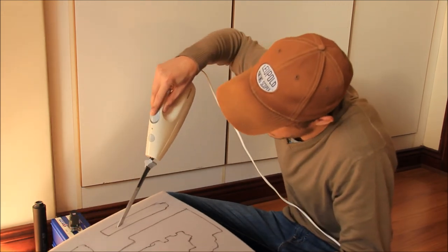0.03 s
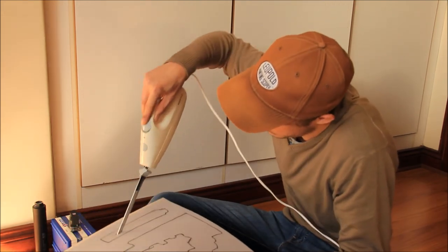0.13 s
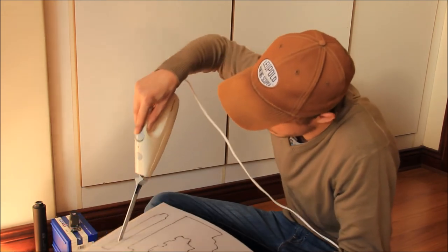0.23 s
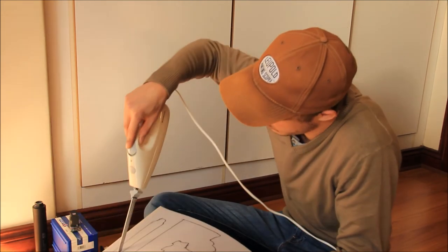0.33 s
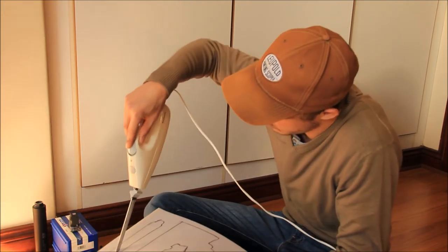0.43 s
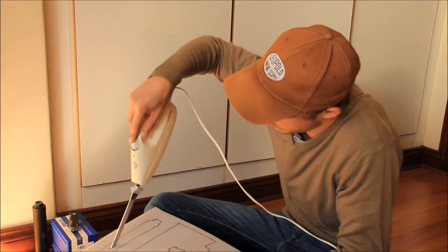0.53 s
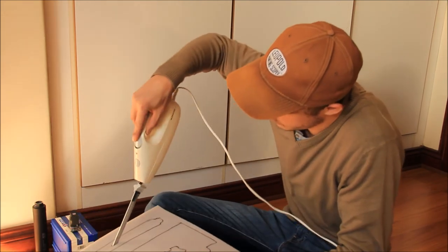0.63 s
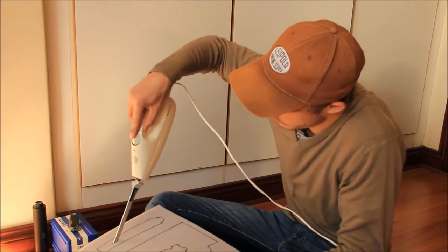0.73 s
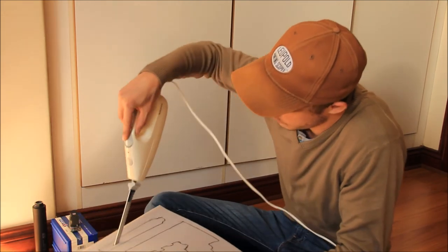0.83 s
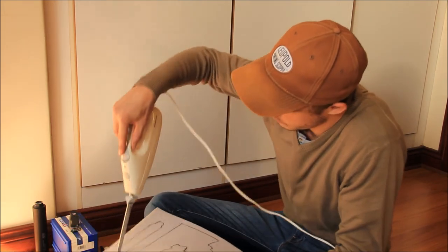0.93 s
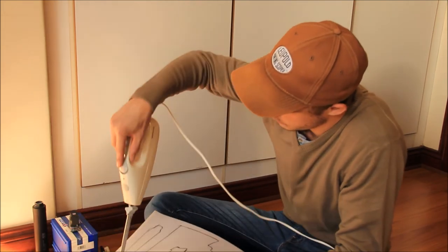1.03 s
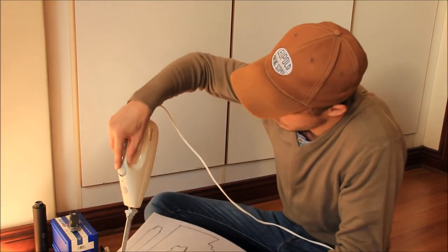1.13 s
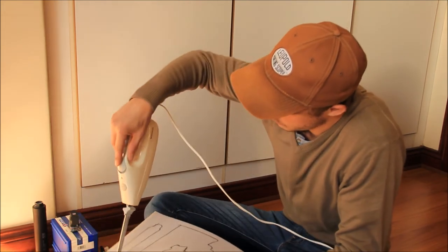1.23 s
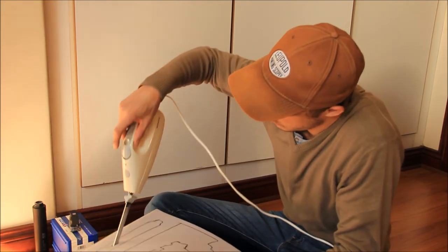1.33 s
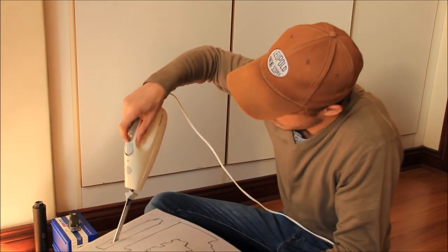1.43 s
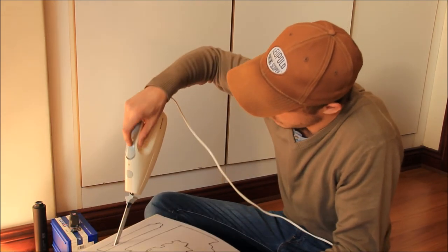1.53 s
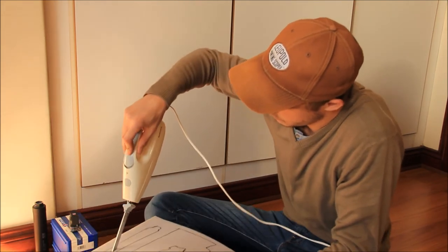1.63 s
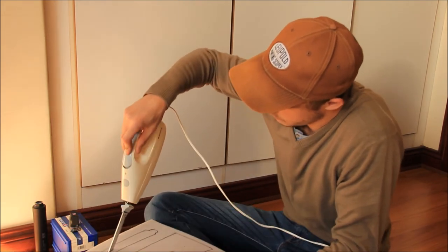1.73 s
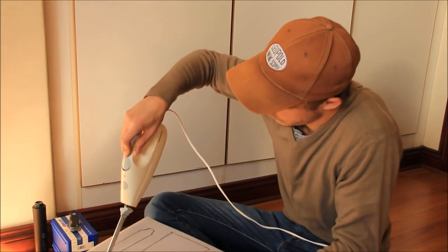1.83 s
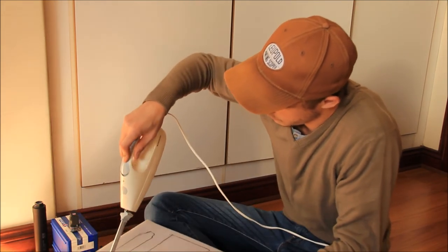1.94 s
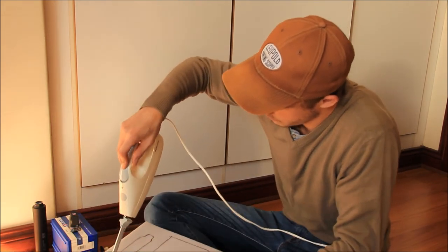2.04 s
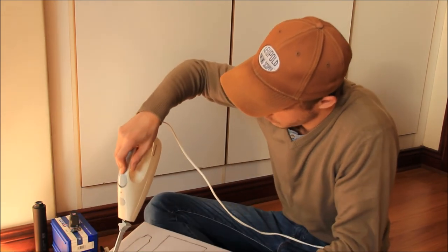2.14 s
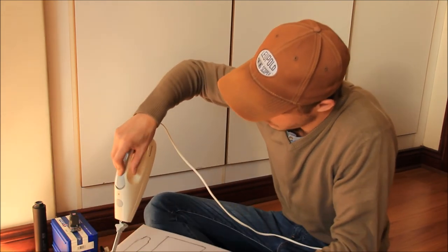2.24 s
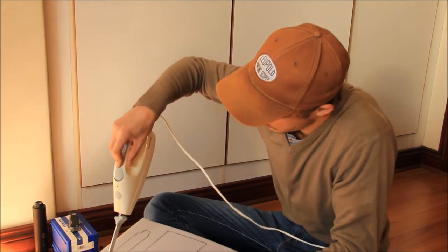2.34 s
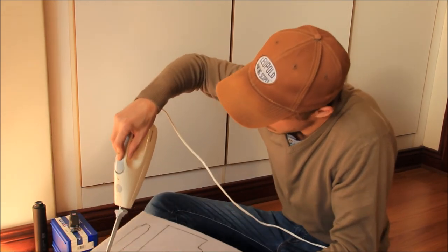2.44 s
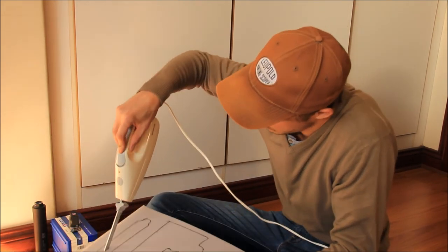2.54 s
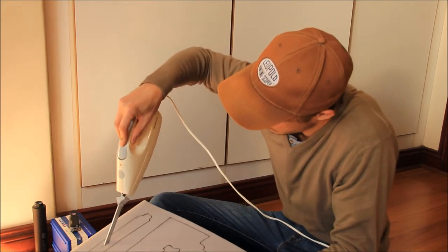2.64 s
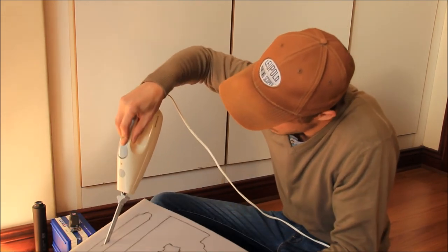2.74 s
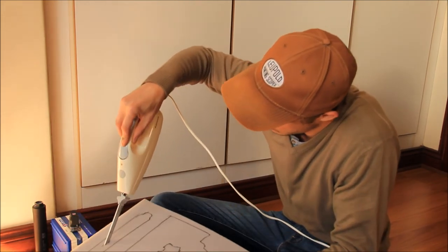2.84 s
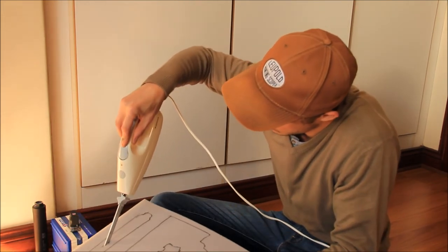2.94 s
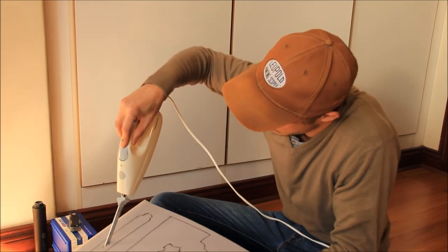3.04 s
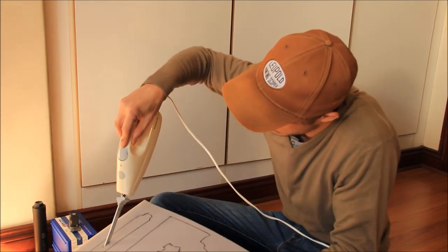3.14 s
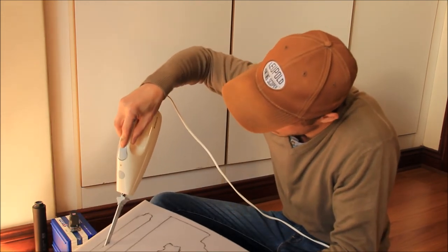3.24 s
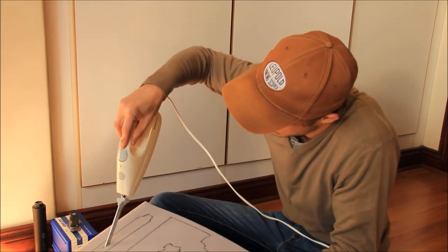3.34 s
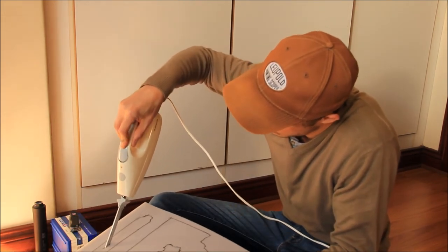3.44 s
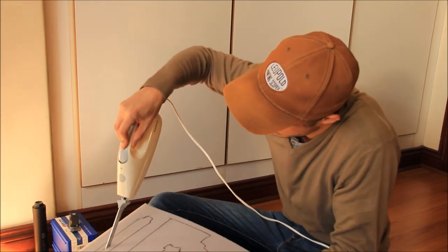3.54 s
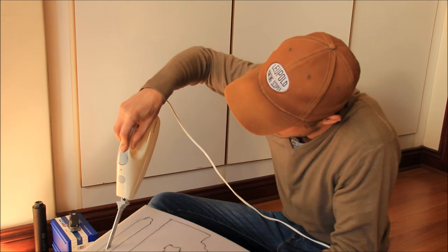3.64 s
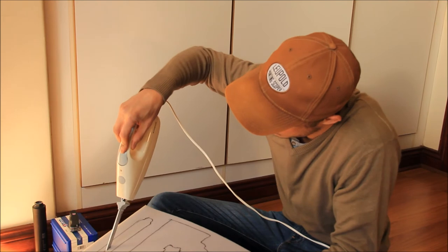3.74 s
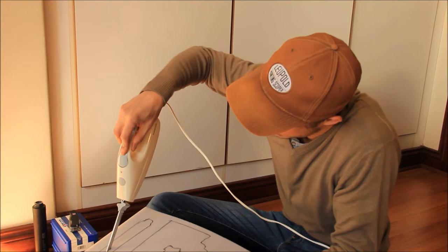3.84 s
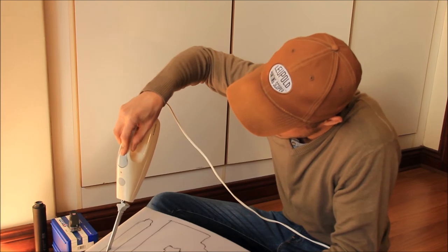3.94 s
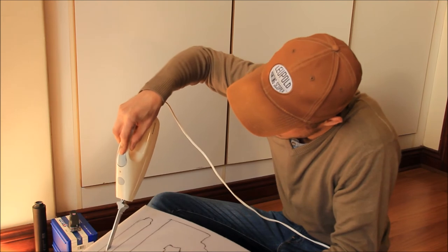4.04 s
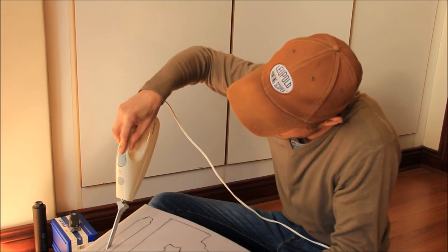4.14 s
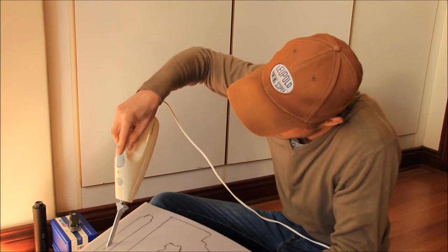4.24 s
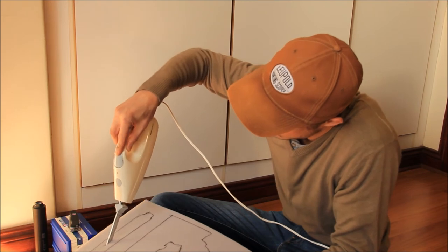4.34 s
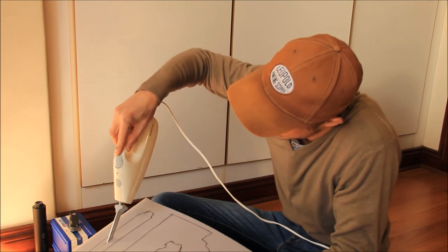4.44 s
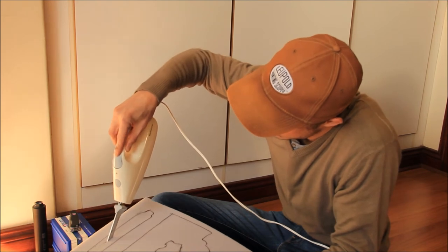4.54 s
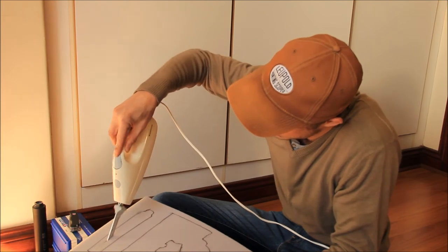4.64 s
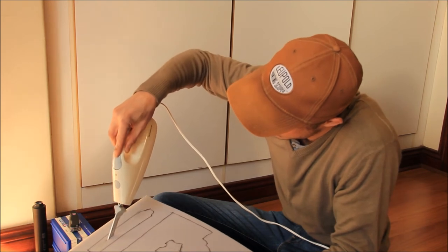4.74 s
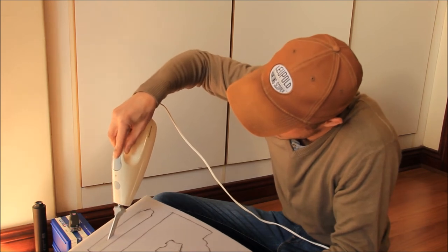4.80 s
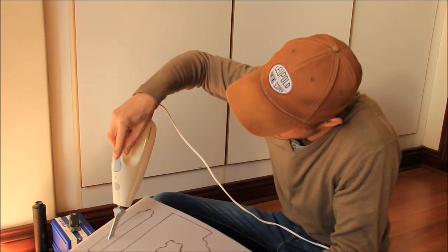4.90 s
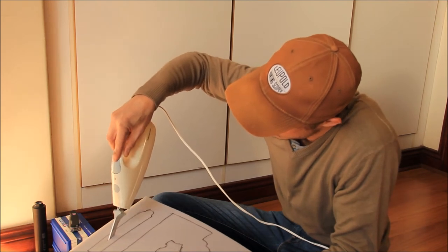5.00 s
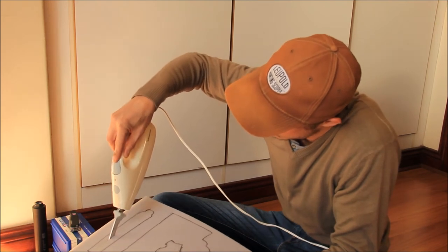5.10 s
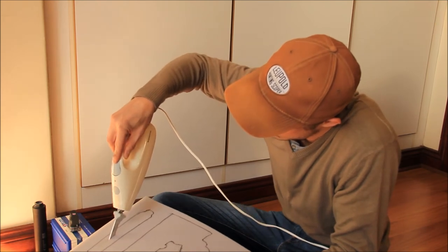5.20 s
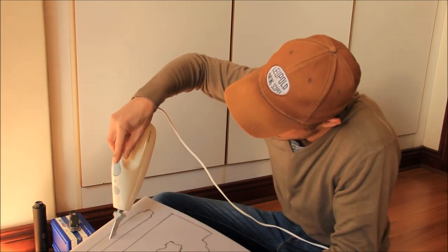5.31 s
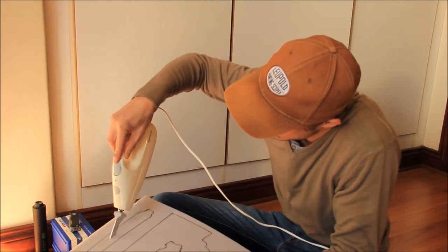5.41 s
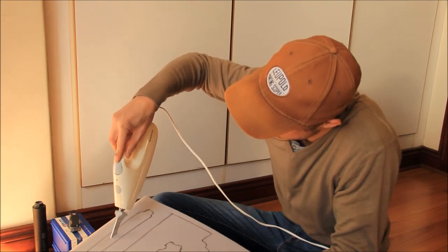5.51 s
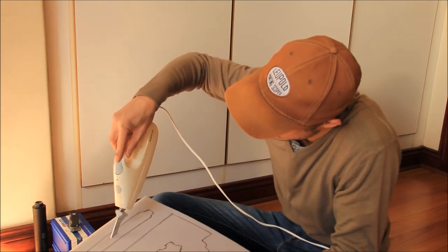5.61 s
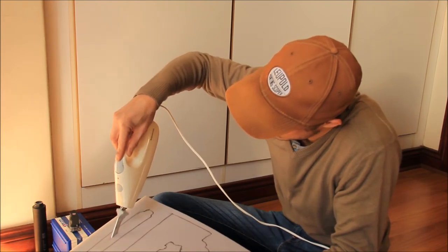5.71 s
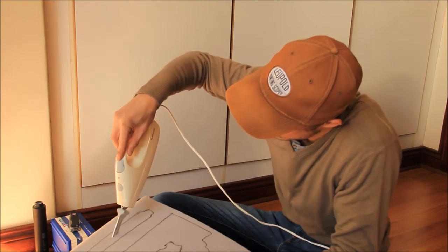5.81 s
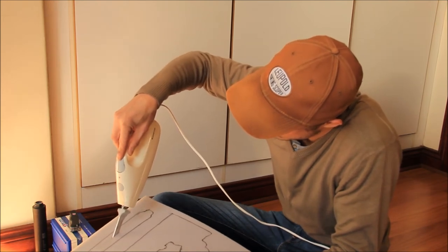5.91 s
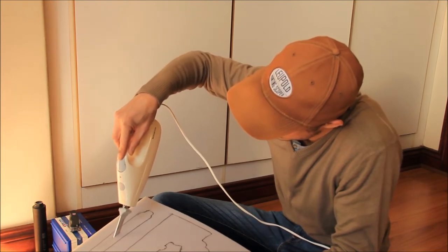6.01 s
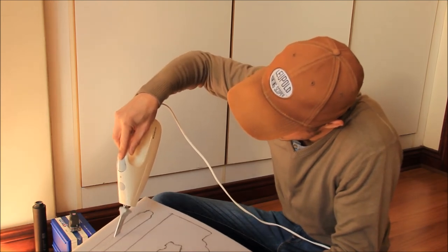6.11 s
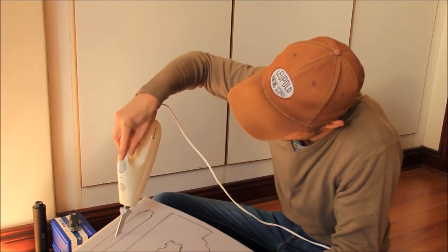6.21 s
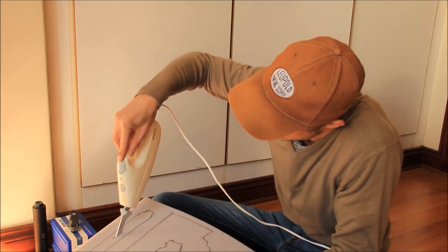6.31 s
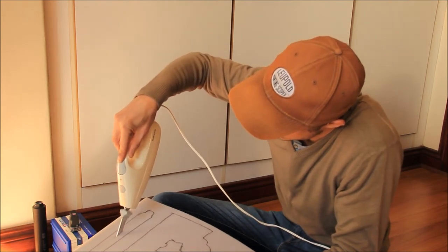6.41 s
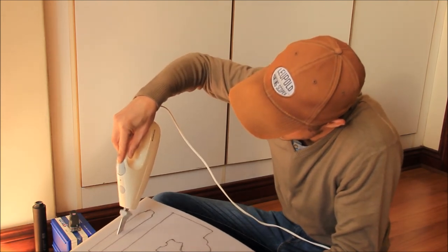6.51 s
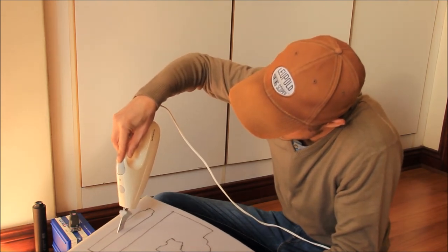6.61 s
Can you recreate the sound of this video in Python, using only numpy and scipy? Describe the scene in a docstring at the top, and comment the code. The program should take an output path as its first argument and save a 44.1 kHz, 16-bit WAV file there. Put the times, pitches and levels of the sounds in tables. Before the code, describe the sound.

In a small room, an electric carving knife is set against a foam slab: plastic knocks, grainy rubbing and one hollow bump over low rumble and hiss. After a quiet gap, a catch snaps, the trigger clicks, and the motor starts suddenly, buzzing and whining upward into a loud, steady clatter and scrape that continues to the end. Close microphone, short room reflections.

```python
"""Small room: an electric carving knife is brought to a foam slab with knocks, rubbing and a dull bump.
Catch and trigger click as struck modes; the motor spins up, sags under load and drives one crank phase.
From it come blade clatter and scrape (coloured grains), handle tones (crank harmonics) and rotor whine.
A starting buzz dies as speed builds, and blade steel clinks. Low rumble and hiss lie under the handling
until the knife starts; a faint hum passes briefly."""
import sys
import numpy as np
from scipy import signal
from scipy.fft import rfft, irfft
from scipy.io import wavfile

SR = 44100
rng = np.random.default_rng(int(sys.argv[2]) if len(sys.argv) > 2 else 0)


def int16_out(signal):
    """Quantize to a 16-bit WAV file."""
    q = np.round(np.clip(np.atleast_2d(signal).T, -1, 1) * 32767)
    wavfile.write(sys.argv[1], SR, q.astype(np.int16))


N = 293706
TIME = np.arange(N) / SR


def amp(db):
    """Decibels to gain."""
    return 10 ** (np.asarray(db) / 20)


def unit(x):
    """Scales to rms 1."""
    return x / np.sqrt(np.mean(x ** 2) + 1e-20)


def at_hz(points, hz):
    """Interpolates (f/Hz, value) points on a log-frequency axis."""
    f_hz, value = np.transpose(points)
    return np.interp(np.log(hz + 1), np.log(f_hz), value)


def colour(x, points):
    """Minimum-phase filter with the given spectrum shape; white noise keeps its level."""
    gain = unit(amp(at_hz(points, abs(np.fft.fftfreq(4096, 1 / SR)))))
    log_spectrum = np.conj(signal.hilbert(np.log(gain)))
    taps = np.fft.ifft(np.exp(log_spectrum)).real
    return signal.oaconvolve(x, taps[:len(taps) // 2])[:N]


def noise():
    """White noise of rms 1."""
    return rng.standard_normal(N)


def wander(rate_hz):
    """Slow random signal of rms 1: noise under a Gaussian low-pass."""
    lowpass = np.exp(-(np.fft.rfftfreq(N, 1 / SR) / rate_hz) ** 2)
    return unit(irfft(rfft(noise()) * lowpass, N))


def grains(per_s, spread_db):
    """Tiny impacts of random time, size and sign, scaled to rms 1."""
    size = amp(spread_db * np.clip(noise(), -2, 2))
    struck = rng.random(N) < per_s / SR
    return unit(np.sign(noise()) * size * struck)


def swell(middle_s, length_s):
    """Smooth rise and fall of height 1; length is taken at half height."""
    return .5 ** (((TIME - middle_s) / (length_s / 2)) ** 2)


def ramp(start_s, rise_s):
    """Goes from 0 to 1 in the rise time."""
    return np.clip((TIME - start_s) / rise_s, 0, 1)


def held(start_s, end_s, fade_s):
    """Fades in around the start, holds, fades out around the end."""
    return ramp(start_s - fade_s / 2, fade_s) - ramp(end_s - fade_s / 2, fade_s)


def add(mix, at_s, sound):
    """Lays a sound into the mix."""
    part = mix[round(at_s * SR):][:len(sound)]
    part += sound[:len(part)]


def ring(at_s, level_db, modes, rise_s=0.00093):
    """One soft-edged blow on a body: a sum of exponentially dying modes."""
    out, t = np.zeros(N), TIME[:SR // 4]
    note = sum(amp(db) * 1000 ** (-t / t60_s) * np.sin(2 * np.pi * hz * t) for hz, db, t60_s in modes)
    add(out, at_s, amp(level_db) * note * (1 - np.exp(-t / rise_s)))
    return out


def highpass(x, hz):
    """Second-order bass cut."""
    return signal.sosfilt(signal.butter(2, hz, "high", fs=SR, output="sos"), x)


# reverberation time: f/Hz, t60/s
ROOM_T60 = [(200, 0.29), (700, 0.73), (2000, 0.46), (5000, 0.6), (14000, 0.54)]


def room(x, wet_db):
    """Direct sound plus sparse echoes that die band by band; sum scaled to keep power."""
    size = SR // 2
    echo_mask = (rng.random(size) < 4000 / SR) * (TIME[:size] > .003)
    taps = rng.choice([-1., 1.], size) * echo_mask
    hz, t, bands = signal.stft(taps, SR, nperseg=256)
    decay = amp(-60 * t / at_hz(ROOM_T60, hz)[:, None])
    tail = signal.istft(bands * decay, SR, nperseg=256)[1]
    echoes = signal.oaconvolve(x, tail / np.linalg.norm(tail))[:N]
    return (x + amp(wet_db) * echoes) / np.hypot(1, amp(wet_db))


# low rumble and hiss, spectrum shape: f/Hz, level/dB
BACKGROUND_COLOUR = [(15, -3), (30, -2), (55, 1), (100, 1), (250, -1), (450, -2), (800, -5), (1400, -9),
                     (2500, -12), (5000, -15), (9000, -16.5), (15500, -18)]
# left-right likeness: f/Hz, likeness/0-1
BACKGROUND_LIKENESS = [(30, 0.23), (150, 1), (550, 0.94), (1650, 0.88), (5000, 0.51), (15000, 0.35)]
BACKGROUND_DB, FADE_OUT_S, FADE_OUT_DB_PER_S = -46, 3.89, 90


def background():
    """Low rumble and hiss, partly alike left and right, faded out from 3.89 s."""
    likeness = np.clip(at_hz(BACKGROUND_LIKENESS, np.fft.rfftfreq(N, 1 / SR)), 0, 1)
    mid = irfft(rfft(noise()) * np.sqrt((1 + likeness) / 2), N)
    side = irfft(rfft(noise()) * np.sqrt((1 - likeness) / 2), N)
    level_db = BACKGROUND_DB - FADE_OUT_DB_PER_S * np.maximum(TIME - FADE_OUT_S, 0)
    stereo = np.array([colour(mid + side, BACKGROUND_COLOUR), colour(mid - side, BACKGROUND_COLOUR)])
    return stereo * amp(level_db)


# blade and sleeve slide over the foam: middle t/s, length/s, rub level/dB, hiss level/dB
SLIDES = [(0.023, 0.16, -50.5, -49), (0.412, 0.21, -45.5, -53), (0.578, 0.049, -48, -44.5),
          (0.84, 0.072, -44.5, -53), (0.987, 0.21, -44.5, -42.5), (1.222, 0.086, -51, -35.5),
          (1.54, 0.29, -57, -50), (1.83, 0.28, -47.5, -51.5), (2.15, 0.35, -47, -63),
          (3.58, 0.11, -56, -57)]
# low and high friction noise, spectrum shapes: f/Hz, level/dB
RUB_COLOUR = [(100, -27), (220, -2), (450, 2.5), (900, -0.5), (1800, -7.5), (2800, -8), (5000, -39)]
HISS_COLOUR = [(1500, 0.5), (3000, -3.5), (4500, 0.5), (6000, -2), (7400, -5), (8700, -3), (10500, -13),
               (13000, -10), (16000, -10)]
PLACING_START_S, PLACING_END_S, PLACING_FADE_S = 0, 2.35, .2
PLACING_RUB_DB, PLACING_HISS_DB = -58, -53


def rubbing(patchy_db=1.5):
    """Grainy, uneven friction as the knife is brought into place: slides over a light rustle."""
    placing = held(PLACING_START_S, PLACING_END_S, PLACING_FADE_S)
    rub_gain, hiss_gain = amp(PLACING_RUB_DB) * placing, amp(PLACING_HISS_DB) * placing
    for middle_s, length_s, rub_db, hiss_db in SLIDES:
        slide = swell(middle_s, length_s)
        rub_gain = np.hypot(rub_gain, amp(rub_db) * slide)
        hiss_gain = np.hypot(hiss_gain, amp(hiss_db) * slide)
    rub = rub_gain * colour(grains(per_s=2200, spread_db=3.0), RUB_COLOUR)
    hiss = hiss_gain * colour(grains(per_s=9000, spread_db=2.5), HISS_COLOUR)
    return (rub + hiss) * amp(patchy_db * wander(40))


# handling and switch knocks: t/s, peak level/dB, thud tilt/dB, tick tilt/dB, decay/s
# the rows at 0.404 and 3.483 are the dying tails of the knocks before them
KNOCKS = [(0.015, -32.5, 7, 7, 0.0068), (0.386, -15, 12, 11, 0.0086), (0.404, -29, 13, 25, 0.016),
          (0.425, -26, -2, 18, 0.0034), (0.455, -21.5, -16, -1, 0.0069), (0.547, -28, -10, -3, 0.003),
          (0.71, -33.5, 6, 10, 0.0044), (0.837, -34, 7, 3, 0.0063), (1.003, -21.5, 3, -4, 0.0031),
          (1.319, -32, -11, 10, 0.006), (1.385, -24.5, 3, 12, 0.0047), (1.391, -19, 18, -5, 0.0038),
          (1.672, -26, -17, -14, 0.0096), (2.075, -33, 15, 5, 0.0052), (2.186, -31, 7, -9, 0.006),
          (2.225, -27, -12, -6, 0.0032), (3.464, -21.5, 7, 18, 0.0066), (3.483, -29.5, -6, 14, 0.016),
          (3.592, -34, 14, -6, 0.006), (3.934, -12, -10, 1.5, 0.0043)]
# plastic handle resonances: f/Hz, width/Hz, level/dB
HANDLE = [(390, 57, -17), (586, 66, 4), (1040, 140, 4), (1595, 500, 11.5), (2250, 650, -12),
          (3660, 1500, -2), (5300, 900, -14.5), (7800, 1600, -13)]


def knocks(low_hz=260):
    """Each knock or knock tail is a short scuff that rings the handle, tilted to thud or tick."""
    out, t = np.zeros(N), TIME[:SR // 10]
    for at_s, peak_db, thud_db, tick_db, decay_s in KNOCKS:
        scuff = rng.standard_normal(len(t)) * np.exp(-t / decay_s)
        tilt = [(600, thud_db), (1100, 0), (2200, 0), (3500, tick_db)]
        handle = np.zeros(len(t))
        for hz, width_hz, mode_db in HANDLE:
            gain = amp(mode_db + at_hz(tilt, hz)) * np.sqrt(width_hz)
            handle += gain * np.exp(-np.pi * width_hz * t) * np.sin(2 * np.pi * hz * t)
        # so small a body gives off little bass
        hit = highpass(signal.fftconvolve(scuff, handle), low_hz)
        add(out, at_s, amp(peak_db) * hit / abs(hit).max())
    return out


# foam slab modes: f/Hz, level/dB, t60/s
SLAB_MODES = [(402, 6, 0.041), (330, -14, 0.029), (520, -20, .03)]


def bump(low_hz=220):
    """The nudged slab gives a short hollow note with little bass."""
    return highpass(ring(1.8405, -20, SLAB_MODES), low_hz)


HUM_START_S, HUM_END_S, HUM_FADE_S = 2.45, 3.05, .15
HUM_HZ, HUM_DB = 191, -50.5


def hum():
    """A faint sine with wandering phase that comes and goes."""
    gain = amp(HUM_DB) * held(HUM_START_S, HUM_END_S, HUM_FADE_S)
    return gain * np.sin(2 * np.pi * HUM_HZ * TIME + 0.27 * wander(3.6))


# safety catch spring modes: f/Hz, level/dB, t60/s
SPRING_MODES = [(1235, -2, .06), (1920, 4.5, 0.048), (3730, -6, 0.045), (4270, -10, .09)]


def catch():
    """The safety catch snaps and its spring rings."""
    return ring(3.4645, -33.5, SPRING_MODES)


# trigger modes: f/Hz, level/dB, t60/s
TRIGGER_MODES = [(1200, -5, .022), (1860, 0, 0.02), (2370, 3, .016), (3050, 2, .014), (3750, -2, .014),
                 (4800, -10, .012), (5900, -6, 0.015), (8200, -10, .012)]


def trigger():
    """The trigger clicks just before the contacts close: a sharp blow on short modes."""
    return ring(3.8984, -25, TRIGGER_MODES, rise_s=.0003)


# foam grips the blades as the cut deepens: t/s, load/0-1
LOAD = [(5.1, 0), (5.97, 1), (6.23, .98), (6.66, .58)]
START_S, FREE_TURNS_PER_S, SAG_TURNS_PER_S = 3.94, 40.45, 1.107  # sag at full load
FAST_SHARE, FAST_S, SLOW_S = .457, .0573, .284


def knife():
    """One crank drives all: speed nears free speed, fast then slowly, and sags under load."""
    age_s = np.maximum(TIME - START_S, 0)
    load = np.interp(TIME, *np.transpose(LOAD))
    lag = FAST_SHARE * np.exp(-age_s / FAST_S) + (1 - FAST_SHARE) * np.exp(-age_s / SLOW_S)
    turns_per_s = FREE_TURNS_PER_S * (1 - lag) - SAG_TURNS_PER_S * load
    turns = np.cumsum(turns_per_s) / SR
    pace = turns_per_s / FREE_TURNS_PER_S
    running = blades(turns) + shaking(turns, pace, load) + whine(turns, pace, load) + inrush(pace)
    return ramp(START_S, 0.036) * running


# hand pushes into the foam: middle t/s, length/s, extra blade noise level/dB, foam drumming level/dB
PUSHES = [(4.057, .06, 1.5, -32.5), (4.225, 0.11, 2.1, -30), (4.4, 0.11, 1.5, -38), (4.557, 0.21, 1, -38),
          (4.92, .07, -0.5, -38), (5.273, .14, 2, -40), (5.54, 0.092, 2, -34), (5.697, 0.076, 2.7, -34.5),
          (6.06, .14, 2, -34), (6.303, .12, 1.3, -38), (6.52, 0.1, 1.9, -44)]
CLATTER_DB, SCRAPE_DB, DRUMMING_DB = -20, -22.5, -43
# blades move slackly, and so more quietly, until they engage
ENGAGE_S, ENGAGE_RISE_S, SLACK_CLATTER_DB, SLACK_SCRAPE_DB = 4.0, 0.0098, -9, -12
# extra noise of a fresh start
SURGE_CLATTER_DB, SURGE_SCRAPE_DB, SETTLE_S = 3.5, 1.2, 0.75
PUSH_SCRAPE_SHARE = 0.76


def effort():
    """Levels/dB of clatter, scrape and foam drumming: blades engage, settle and answer each push."""
    slack = 1 - ramp(ENGAGE_S, ENGAGE_RISE_S)
    surge = np.exp(-np.maximum(TIME - START_S, 0) / SETTLE_S)
    push_db = sum(db * swell(s, length_s) for s, length_s, db, _ in PUSHES)
    drumming = amp(DRUMMING_DB) + sum(amp(db) * swell(s, length_s) for s, length_s, _, db in PUSHES)
    clatter_db = CLATTER_DB + SLACK_CLATTER_DB * slack + SURGE_CLATTER_DB * surge + push_db
    scrape_db = SCRAPE_DB + SLACK_SCRAPE_DB * slack + SURGE_SCRAPE_DB * surge + PUSH_SCRAPE_SHARE * push_db
    return clatter_db, scrape_db, 20 * np.log10(drumming)


def strokes(turns, depth_db, uneven_db):
    """Gain swells twice a crank turn, as the blades slide out and back with unequal force."""
    twice_db = depth_db * np.cos(2 * np.pi * 2 * turns)
    once_db = uneven_db * np.cos(2 * np.pi * turns)
    return unit(amp(twice_db + once_db))


# running blades, spectrum shapes: f/Hz, level/dB
CLATTER_COLOUR = [(150, -36.5), (330, -15.5), (450, -5), (600, -4), (830, 0), (1080, -3), (1400, -2),
                  (1720, 0.5), (2020, -8), (2250, -5), (2480, -7), (2700, -5.5), (3000, -16), (5000, -50)]
SCRAPE_COLOUR = [(1500, -24), (2900, 0), (3600, 1), (4400, 0.5), (5300, -2), (6400, -5), (7100, -4.5),
                 (7600, -7), (8400, -6), (9900, -13.5), (11000, -16.5), (11800, -12.5), (14500, -19.5),
                 (16000, -23)]
DRUMMING_COLOUR = [(30, -32), (100, -48), (170, -12), (250, -9), (340, -4), (410, 1), (520, 1), (900, -51)]


def blades(turns, unsteady_db=.5):
    """Slack linkage knocks at each reversal; toothed blades scrape and shake the foam between."""
    clatter_db, scrape_db, drumming_db = effort()
    reversals = np.diff(np.floor(2 * (turns + .006 * wander(40))), prepend=0) > 0
    reversal_knocks = unit(reversals * amp(np.clip(noise(), -2, 2)))
    rattle = grains(per_s=3500, spread_db=4) * strokes(turns, depth_db=1.0, uneven_db=0.2)
    clatter = colour(unit(rattle + 0.18 * reversal_knocks), CLATTER_COLOUR) * amp(clatter_db)
    teeth = unit(noise() + grains(per_s=3000, spread_db=4) + 0.19 * reversal_knocks)
    stroked_teeth = teeth * strokes(turns, depth_db=1.5, uneven_db=0.82)
    scrape = colour(stroked_teeth, SCRAPE_COLOUR) * amp(scrape_db)
    drumming = colour(unit(noise() + .5 * reversal_knocks), DRUMMING_COLOUR) * amp(drumming_db)
    in_room = room(clatter + drumming, wet_db=-7.5) + room(scrape, wet_db=-6.5)
    return in_room * amp(unsteady_db * wander(14))


# handle tones, relative levels: multiple of crank speed, level/dB
SHAKE_TONES = [(2, -68), (3, -58), (4, -54), (5, -49.5), (6, -50.5), (7, -51), (8, -51), (10, -43),
               (12, -47), (14, -37), (15, -40), (16, -38), (17, -45), (18, -36), (19, -32), (20, -33),
               (21, -39), (22, -36.5), (23, -39), (24, -43), (25, -36.5), (29, -44), (33, -42), (35, -38.5),
               (42, -44), (47, -44), (49, -42.5)]
# free-running offset and its change at full load; boom is the slab's, damped by load
SHAKE_DB, SHAKE_LOAD_DB, BOOM_DB, BOOM_LOAD_DB = 1.04, 1.5, 3.5, -13.5


def shaking(turns, pace, load, waver_db=2.5):
    """Crank harmonics grow with speed, waver, and shift their balance with load."""
    shake, boom_db = np.zeros(N), BOOM_DB + BOOM_LOAD_DB * load
    for k, db in SHAKE_TONES:
        level_db = db + waver_db * wander(2) + boom_db * (k <= 4)
        # play in the linkage blurs the higher tones most
        blur_rad = k * .008 * wander(10)
        phase_rad = 2 * np.pi * (k * turns + rng.random()) + blur_rad
        shake += np.sqrt(2) * amp(level_db) * np.cos(phase_rad)
    return shake * amp(SHAKE_DB + SHAKE_LOAD_DB * load) * pace ** 5


# motor housing resonances: f/Hz, width/Hz, level/dB
HOUSING_MODES = [(1590, 130, -18.5), (2170, 45, -25), (2298, 23, -28.5), (2600, 190, -31.5)]


def housing(hz):
    """Housing gain at a pitch: resonances light up as the whine glides through."""
    return sum(amp(db) / (1 + ((hz - centre_hz) / width_hz) ** 2) for centre_hz, width_hz, db in HOUSING_MODES)


GEAR_RATIO = 25 / 3  # rotor turns per crank turn, through the worm gear


def whine(turns, pace, load, octave_db=-40, lower_db=-2, lower_load_db=1.0, waver_db=2, rough=0.16, judder=2):
    """Rotor sings at 7 and 8 times its speed through the housing, faintly at 16; load favours 7."""
    rotor_rad = 2 * np.pi * GEAR_RATIO * turns
    rotor_hz = GEAR_RATIO * FREE_TURNS_PER_S * pace
    lower = amp(lower_db + lower_load_db * load)
    partials = [
        (7, lower * housing(7 * rotor_hz)),
        (8, housing(8 * rotor_hz)),
        (16, amp(octave_db) * pace),
    ]
    # the rotor judders more the further it is below free speed
    blur_rad = rough + judder * (1 - pace)
    return sum(gain * amp(waver_db * wander(23)) * np.cos(k * rotor_rad + blur_rad * wander(47))
               for k, gain in partials)


# starting buzz, spectrum shape: f/Hz, level/dB
INRUSH_COLOUR = [(300, -17.5), (700, -18), (1100, 0), (1350, 1), (1700, -0.5), (2000, -27), (3000, -15),
                 (6000, -50)]
INRUSH_S, INRUSH_RISE_S, INRUSH_DB, INRUSH_POWER = 3.96, 0.01, -20, 0.69


def inrush(pace, throb_hz=120, depth_db=1.5):
    """Brush and gear noise throbs with the supply current, fading as the rotor gathers speed."""
    throb = unit(amp(depth_db * np.cos(2 * np.pi * throb_hz * TIME)))
    current = ramp(INRUSH_S, INRUSH_RISE_S) * (1 - pace) ** INRUSH_POWER
    return colour(noise() * throb, INRUSH_COLOUR) * amp(INRUSH_DB) * current


# steel blades take up their play: t/s, level/dB
CLINKS = [(4.013, -11.5), (4.025, -27), (4.04, -27), (4.062, -16), (4.085, -30), (4.14, -17), (4.157, -18),
          (4.172, -20), (4.271, -15), (4.379, -15), (4.49, -18), (4.543, -15)]


def clinks(centre_hz=8300, decay_s=0.0026):
    """Brief high rings of blade steel, each slightly off in pitch."""
    out, t = np.zeros(N), TIME[:SR // 10]
    for at_s, db in CLINKS:
        hz = centre_hz * (1 + 0.013 * rng.standard_normal())
        add(out, at_s, amp(db) * np.exp(-t / decay_s) * np.sin(2 * np.pi * hz * t))
    return out


def scene():
    """All sources sit in the middle, over the stereo background."""
    contacts = knocks() + catch() + trigger() + clinks()
    handling = room(contacts, wet_db=-7.5) + room(bump(), wet_db=-7.5)
    return background() + rubbing() + handling + hum() + knife()


EDGE_HZ = 15900


def record(dry):
    """Steep low-pass band limit."""
    taps = signal.firwin(1001, EDGE_HZ, window=("kaiser", 9), fs=SR)
    return signal.oaconvolve(dry, taps[None], "same")


dry = scene()
out = record(dry)
int16_out(out)
```